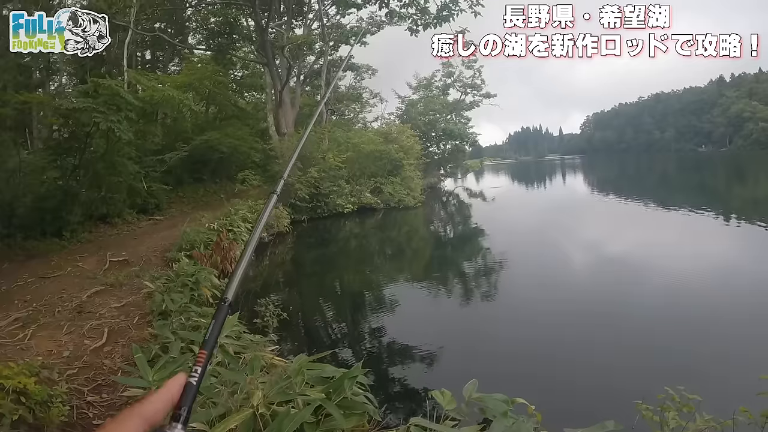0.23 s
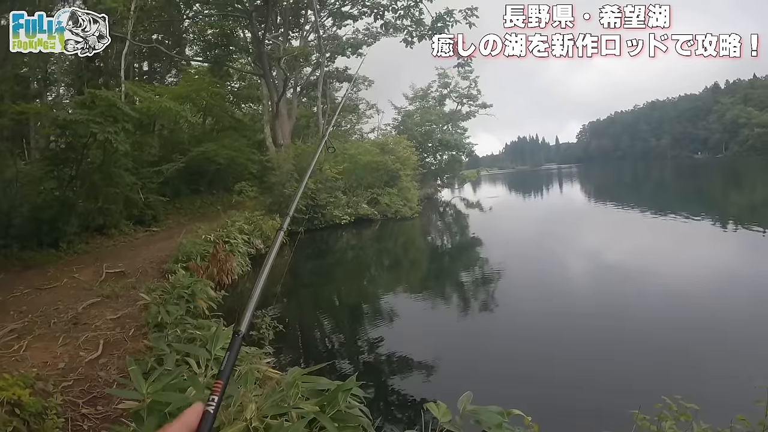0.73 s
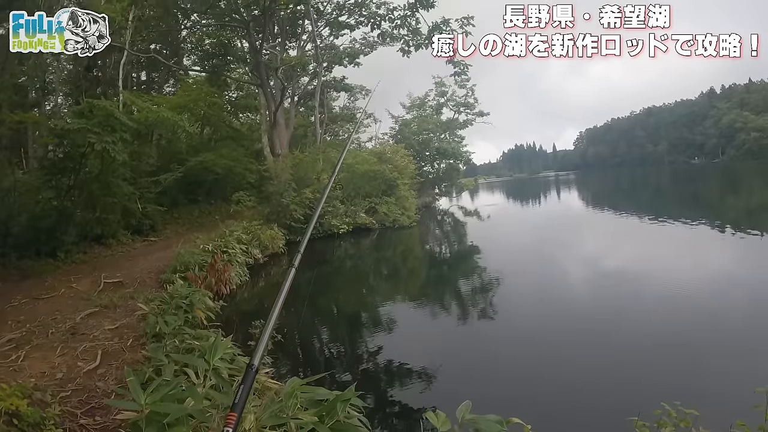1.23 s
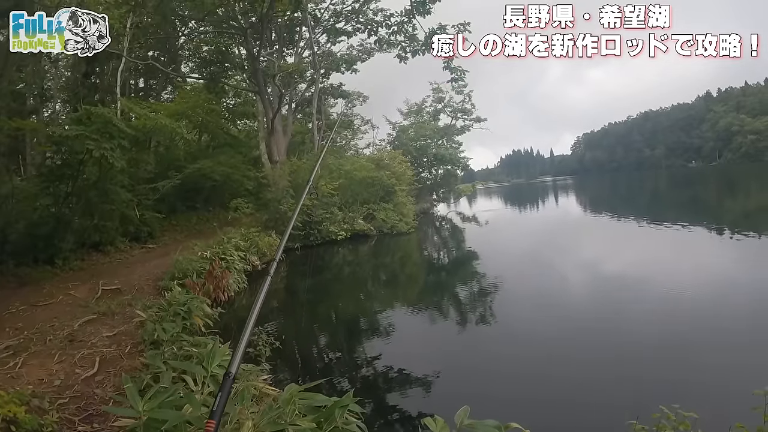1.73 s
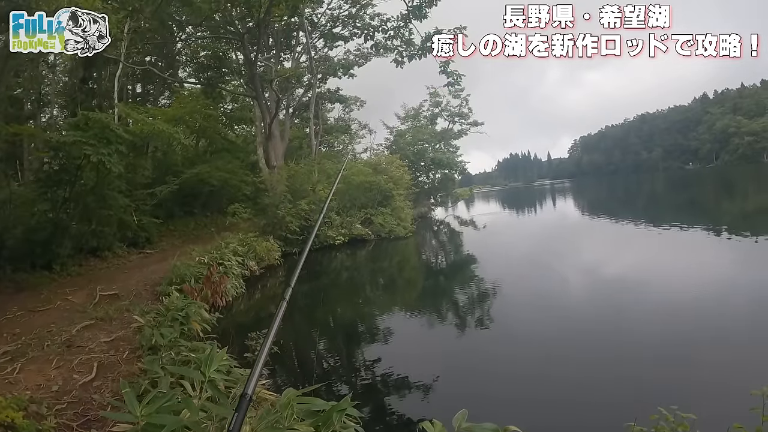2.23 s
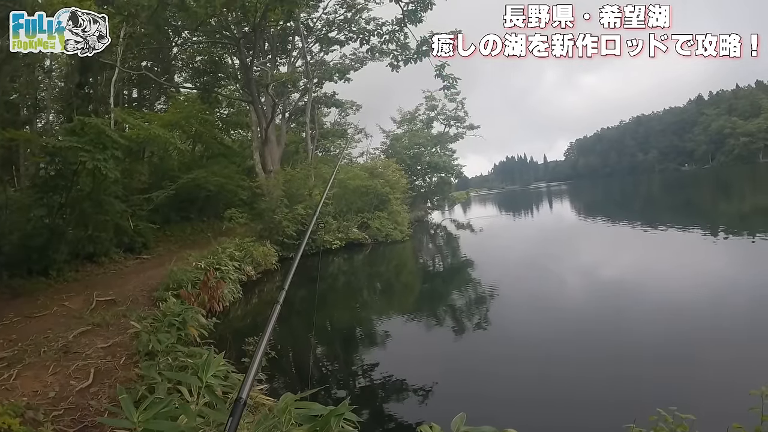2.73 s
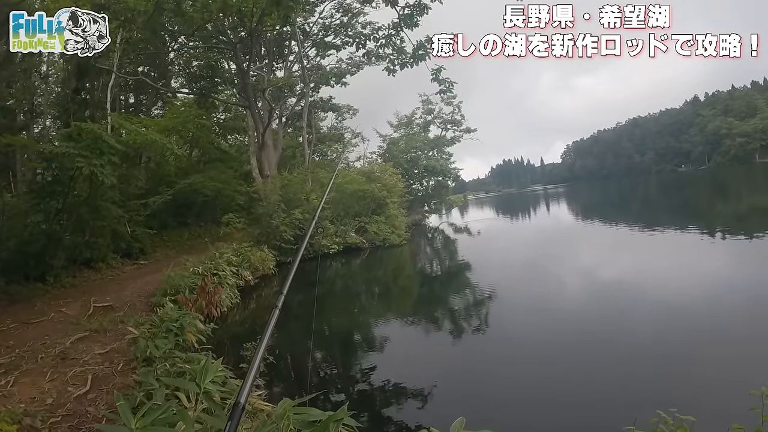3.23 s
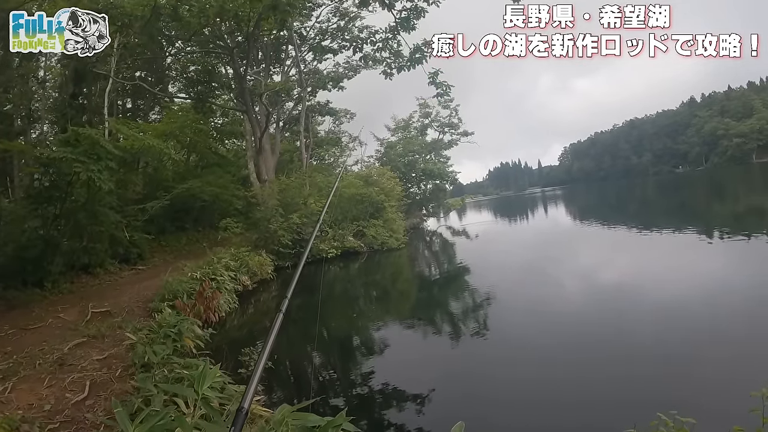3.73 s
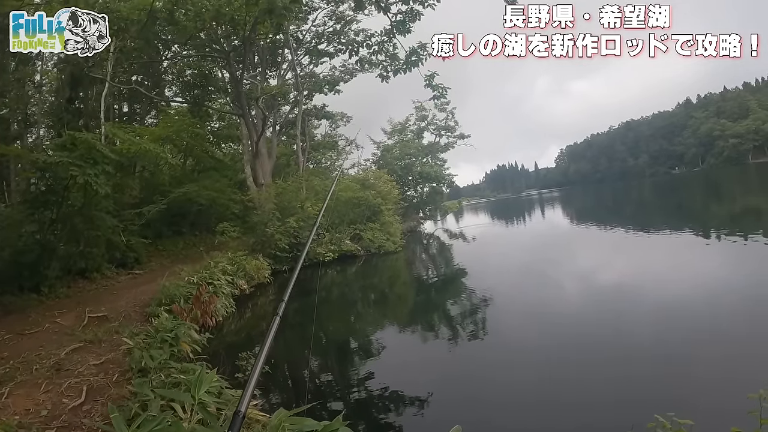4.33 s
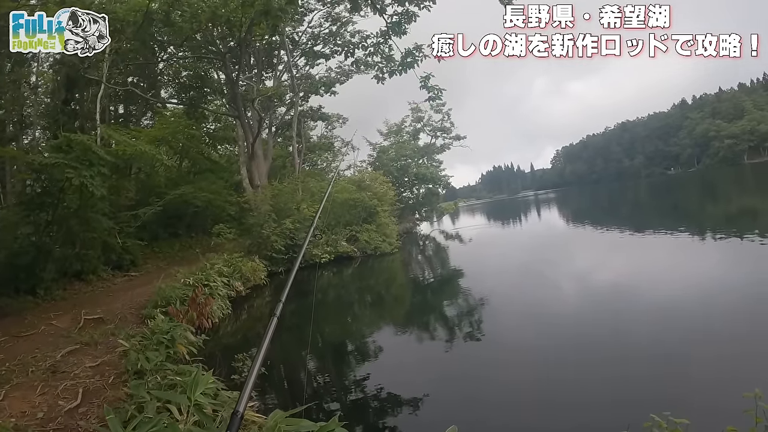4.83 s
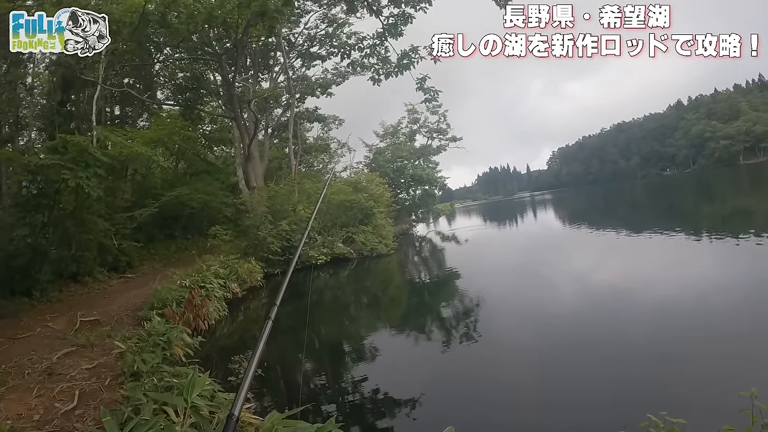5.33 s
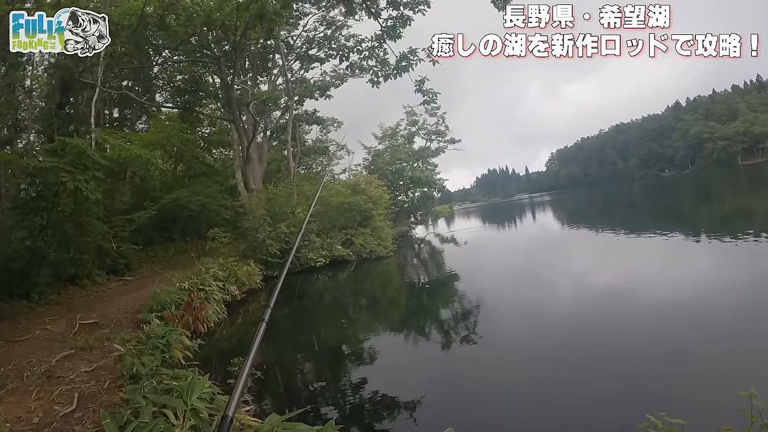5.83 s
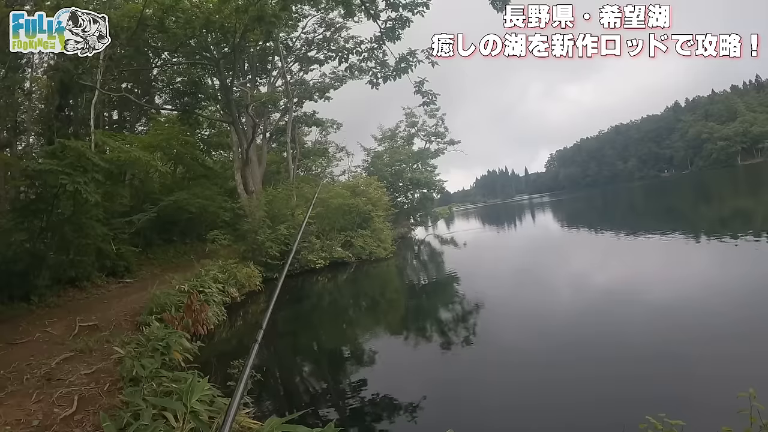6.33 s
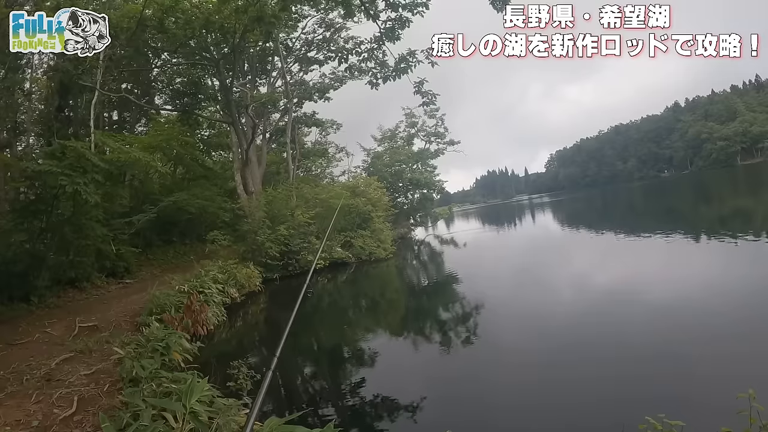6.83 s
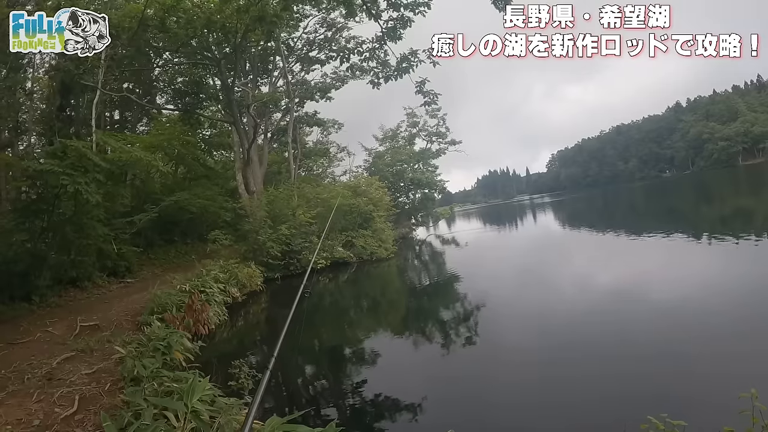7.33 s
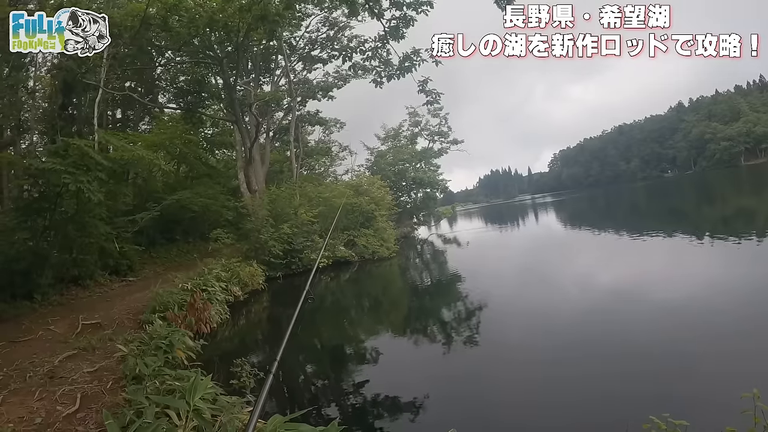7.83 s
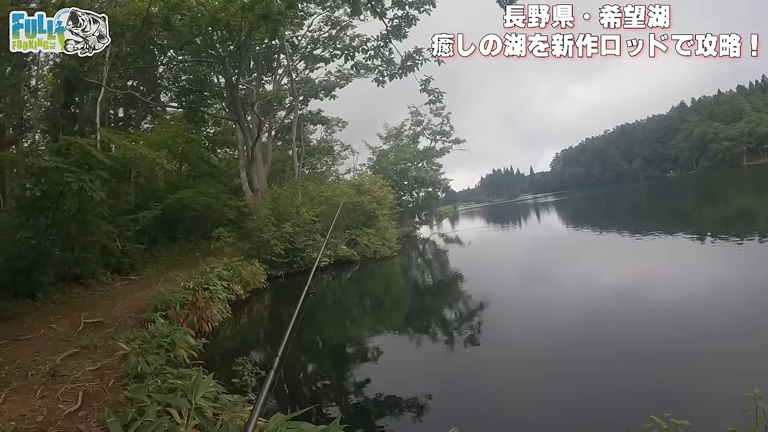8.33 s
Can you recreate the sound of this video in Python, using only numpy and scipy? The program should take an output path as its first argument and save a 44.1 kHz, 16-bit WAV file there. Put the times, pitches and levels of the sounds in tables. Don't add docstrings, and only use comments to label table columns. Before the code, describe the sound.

A bright, unbroken cicada chorus fills woods beside a still lake, heard in stereo from a camera worn by someone fishing. A near cicada, slightly left, buzzes in a dry, rapid rattle throughout, over the smooth hiss of a far crowd. From 0 to 0.7 seconds a distant bird to the right gives short, rough, echoing whistles; fainter notes follow around 1.1 and 3.7. Tiny rod ticks come at about 0.6, 1.05 and 1.3. A faster, higher cicada on the right swells around 1.9, strongest and longest near 4.5, then briefly at 7.2 and 7.9. From about 4 seconds, very faint high rasps of the reel and whispering line sit to the left, slightly clearer near 8.4. Soft low bumps and swaying rumble from the camera recur irregularly to the end at 8.6, above a faint far drone and quiet air.

```python
import sys
import numpy as np
from scipy import signal
from scipy.fft import rfft, irfft, next_fast_len
from scipy.io import wavfile
from scipy.ndimage import uniform_filter1d, map_coordinates

SR = 44100
rng = np.random.default_rng(int(sys.argv[2]) if len(sys.argv) > 2 else 0)


def materialize(psi):
    bounded = np.clip(np.atleast_2d(psi).T, -1, 1)
    quanta = np.round(bounded * 32767).astype(np.int16)
    wavfile.write(sys.argv[1], SR, quanta)


def how_loud(loudness_db):
    steps = np.asarray(loudness_db, float) / 20
    return 10 ** steps


N = 379260
T = np.arange(N) / SR


def unit(x):
    return x / np.sqrt(np.mean(x ** 2) + 1e-20)


def along(points, hz):
    point_hz, value = np.transpose(points)
    return np.interp(np.log(hz + 1), np.log(point_hz + 1), value)


def level_over_time(rows):
    start_s, level_db = np.transpose(rows)
    return np.interp(T, start_s, level_db)


def wobble(rate):
    points = rng.standard_normal(int(N * rate / SR) + 4)
    return map_coordinates(points, [T * rate], order=2)


def bumps(times, sizes, width):
    swells = np.broadcast(times, sizes, width)
    return sum(size * np.exp(-.5 * ((T - s) / w) ** 2) for s, size, w in swells)


def filtered(x, response):
    size = next_fast_len(N + 8192)
    gain = response(np.fft.rfftfreq(size, 1 / SR))
    return irfft(rfft(x, size) * gain, size)[..., :N]


# pitch_hz, likeness (1 = same)
LIKENESS = [(30, .82), (130, .85), (280, .72), (590, .42), (1280, .5), (2750, .84), (5900, .83), (9000, .6),
            (12700, .3)]
# pitch_hz, left_minus_right_db
LEFT_LOUDER = [(60, -0.5), (110, -0.5), (200, -2.5), (360, -3), (650, -4.5), (1170, -0.5), (2130, 1.0),
               (3860, 2), (6990, 2), (12700, 2)]
# pitch_hz, left_leads_radians
LEFT_LEADS = [(0, 1), (1640, -0.91), (2670, -1.05), (2930, -0.93), (3450, -0.0), (4390, -0.73),
              (7490, 0.062), (9220, 0.43), (12800, -0.31)]


def rush(spectrum, patchy_db):
    cells = signal.stft(rng.standard_normal((2, N)), nperseg=512)[2]
    patches = rng.standard_normal(cells.shape[1:])
    patches = uniform_filter1d(patches, size=6, axis=0)
    patches = unit(uniform_filter1d(patches, size=14, axis=1))
    pair = signal.istft(cells * how_loud(patchy_db * patches), nperseg=512)[1][:, :N]

    def shares(hz):
        angle = np.arccos(np.clip(along(LIKENESS, hz), -1, 1)) / 2
        return how_loud(along(spectrum, hz)) * [np.cos(angle), np.sin(angle)]

    def ports(hz):
        tilt = how_loud(along(LEFT_LOUDER, hz) / 2) * np.exp(.5j * along(LEFT_LEADS, hz))
        return [tilt, 1 / tilt]

    mid, side = filtered(pair, shares)
    return unit(filtered(np.array([mid + side, mid - side]), ports))


def falling_chirp(u, length, from_hz, to_hz):
    return 2 * np.pi * length * u * (from_hz + (to_hz - from_hz) * u / 2)


def clicks(cycles, rate, from_hz, to_hz, length, scatter_db, jitter):
    stroke = np.floor(cycles).astype(int)
    first = stroke.min()
    luck = rng.standard_normal((stroke.max() - first + 1, 2))[stroke - first]
    late_s = jitter * (3 + luck[:, 0])
    u = ((cycles - stroke) / rate - late_s) / length
    shape = np.sin(np.pi * np.clip(u, 0, 1) ** 0.93) ** 2
    return how_loud(scatter_db * luck[:, 1]) * shape * np.sin(falling_chirp(u, length, from_hz, to_hz))


def among_trees(x, pan_db, wet_db, t60):
    t = np.arange(SR // 4) / SR
    tail = rng.standard_normal((2, len(t))) * how_loud(-60 * t / t60)
    tail = tail / np.linalg.norm(tail[0])
    wet = signal.fftconvolve(x[None], tail, axes=1)[:, :N]
    direct = x * how_loud(np.array([[pan_db], [-pan_db]]) / 2)
    return direct + how_loud(wet_db) * wet


# start_s, level_db
NEAR_LEVEL = [(0, -56), (.8, -56), (2.9, -53), (4, -53), (4.5, -55), (6, -53), (6.6, -54), (7.4, -52.5),
              (8.6, -52.5)]
# peak_after_stroke_ms, level_db, start_hz, end_hz, length_ms
RIBS_OF_DRUM = [(0, 1, 5200, 3300, 2), (.9, -6, 4000, 2900, 4.2), (2.2, -10, 4500, 3200, 2.5),
                (3.3, -7, 5000, 3500, 2), (4.6, -1, 5100, 3400, 2.2), (4.8, -10, 4000, 2900, 2.6),
                (6.1, -9, 4100, 3000, 2.5), (7.8, -5, 5000, 3400, 2.2), (8.4, -12, 3900, 2900, 2.5),
                (9.2, -11, 5000, 3600, 2)]
# pitch_hz, level_db
BELLY = [(2750, -18), (2950, 0), (3040, -5), (3110, -19), (3250, -3), (3480, -1.5), (3600, -7), (3740, 0),
         (3920, -4), (4420, -1.5), (4570, -1.5), (4750, 7), (4950, -2.5), (7000, -5)]


def near_cicada():
    rate = 47.17
    late_ms = .3 + 5 * (1 - np.exp(-T / 2.6)) - .3 * T
    stroke = rate * (T - late_ms / 1000) - .2 + 0.0025 * wobble(4)
    song = 0
    for peak_ms, level_db, start_hz, end_hz, length_ms in RIBS_OF_DRUM:
        closer = 1.04 - 0.01027 * T
        start_s = (peak_ms * closer - 0.389 * length_ms + 0.061 * wobble(1.227)) / 1000
        strength = how_loud(level_db + 1.2 * wobble(1.5))
        song = song + strength * clicks(stroke - rate * start_s, rate, start_hz, end_hz,
                                        length_ms / 1000, scatter_db=1.3, jitter=.000011)
    song = unit(filtered(song, lambda hz: how_loud(along(BELLY, hz))))
    return among_trees(how_loud(level_over_time(NEAR_LEVEL) + 1.5) * song, pan_db=3, wet_db=-11, t60=.12)


# start_s (its middle), rise_db, width_s
SWELLS = [
    (.1, 2, 0.35),
    (1.899, 3, 0.98),
    (3.4, 1, 0.2),
    (4.5, 7, 0.72),
    (7.2, 3, 0.16),
    (7.9, 4.5, 0.32),
]


def fast_cicada():
    rate = 108.55
    effort_db = bumps(*np.transpose(SWELLS))
    hz = 5800 + 42 * effort_db
    stroke = rate * T + .011 * wobble(2.5)
    rib = clicks(stroke, rate, 1.04 * hz, .96 * hz, .0038, scatter_db=1.1, jitter=.000003)
    wide_click = clicks(stroke, rate, 8000, 5000, .0024, scatter_db=1.1, jitter=.000003)
    song = unit(rib + how_loud(-8) * wide_click)
    level_db = -63 + effort_db + 0.86 * wobble(6.8)
    return among_trees(how_loud(level_db) * song, pan_db=-6, wet_db=-5.5, t60=.12)


# start_s, level_db
CROWD_LEVEL = [(0, -47.5), (1, -47), (3.8, -47), (4.6, -46), (5.7, -47), (8.6, -46.5)]
# pitch_hz, level_db_per_hz
CROWD_HISS = [(2500, -66), (2800, -24.5), (3150, -18), (3300, -13.5), (3900, -8), (4150, -3), (4650, -3),
              (5100, -3.5), (5900, -5), (6400, -7.5), (7200, -15), (8000, -22.5), (10000, -39.5),
              (13000, -44.5)]


def crowd():
    voices = 0
    for rate, hz in [(51, 4430), (45, 4800), (104, 5450), (111, 5900), (106, 6300)]:
        strength = how_loud(1.5 * wobble(1.2))
        stroke = rate * T + .03 * wobble(2.2)
        voices = voices + strength * clicks(stroke, rate, 1.06 * hz, .94 * hz, .0035,
                                            scatter_db=1.5, jitter=.000005)
    distinct = how_loud(-13) * among_trees(unit(voices), pan_db=-2, wet_db=-6, t60=.2)
    hiss = how_loud(-4.5) * rush(CROWD_HISS, patchy_db=.5)
    return how_loud(level_over_time(CROWD_LEVEL) + 0.27 * wobble(9.2)) * (hiss + distinct)


# start_s (its middle), knock_db, sway_db
JOLTS = [(.38, -62, -56), (.95, -58.5, -49.5), (1.27, -59, -60), (1.45, -53.5, -48), (1.94, -58, -58),
         (2.15, -68, -76), (2.47, -53.5, -59), (2.67, -63, -74), (3.04, -60, -67), (3.21, -69, -59),
         (3.42, -63, -58), (3.55, -56, -59), (3.71, -67, -56.5), (4.07, -54.5, -58), (4.42, -76, -64),
         (4.57, -53, -60), (4.93, -64, -58), (5.08, -51, -55), (5.3, -71, -69), (5.58, -63, -47.5),
         (6.13, -60, -53), (6.5, -78, -55), (6.67, -56, -52), (6.82, -64, -56), (7.15, -54.5, -61),
         (7.5, -74, -63), (7.74, -63, -82), (7.87, -76, -59), (8.19, -60, -53.5), (8.54, -59, -45.5)]
# pitch_hz, level_db_per_hz
SWAY_COLOUR = [(5.9, -40), (10, 5.5), (32, 8.5), (60, -17), (78, -26), (130, -120)]
# pitch_hz, level_db_per_hz
KNOCK_COLOUR = [(32, -26.5), (55, 4.5), (86, -6.5), (120, -12.5), (160, -16), (260, -120)]


def mount():
    start_s, knock_db, sway_db = np.transpose(JOLTS)
    sway = how_loud(-58.5) + bumps(start_s, how_loud(sway_db), width=0.052)
    knock = how_loud(-72.5) + bumps(start_s, how_loud(knock_db), width=0.027)
    return sway * rush(SWAY_COLOUR, patchy_db=1.6) + knock * rush(KNOCK_COLOUR, patchy_db=-1.5)


# start_s, length_s, from_hz, to_hz, level_db
BIRD_NOTES = [(0, 0.064, 2184, 2240, -60.5), (.09, 0.088, 1340, 2046, -62.5),
              (.145, 0.049, 2050, 2105, -55.5), (.2, 0.079, 2043, 2100, -66), (.25, .05, 2850, 3000, -75),
              (.285, .055, 2260, 2080, -63), (.29, .05, 1950, 2020, -62), (.3, .04, 2600, 2450, -73),
              (.36, .07, 2200, 2090, -73), (.525, .035, 2450, 1650, -63), (.55, .035, 1750, 1300, -66),
              (.575, .035, 1260, 1120, -63), (.67, .09, 2200, 2200, -76), (1.01, .1, 1130, 1100, -72),
              (1.19, .09, 1070, 1060, -72), (3.69, .08, 2130, 2030, -67), (3.76, .1, 1620, 2060, -72)]


def bird():
    song = np.zeros(N)
    tremor = .35 * np.pi * wobble(160)
    for start_s, length_s, from_hz, to_hz, level_db in BIRD_NOTES:
        u = np.clip((T - start_s) / length_s, 0, 1)
        roughness = np.sqrt(abs(to_hz - from_hz) / 300)
        phase = falling_chirp(u, length_s, from_hz, to_hz) + tremor * roughness
        shape = np.abs(np.sin(np.pi * u)) ** .55 * (u < 1)
        song += how_loud(level_db) * shape * np.sin(phase)
    flutter = how_loud(-.5 + 3 * wobble(140))
    return among_trees(song * flutter, pan_db=-4, wet_db=-2, t60=.4)


# start_s (its middle), level_db
ROD_TICKS = [
    (.6, -67),
    (1.054, -63),
    (1.26, -70),
]
# pitch_hz, level_db_per_hz
TICK_COLOUR = [(300, -30), (700, -6), (2500, 0), (9000, -8), (14000, -20)]


def rod():
    start_s, level_db = np.transpose(ROD_TICKS)
    return bumps(start_s, how_loud(level_db), width=.004) * rush(TICK_COLOUR, patchy_db=0)


# start_s (its middle), level_db
REEL_RASPS = [(4.13, -81), (4.44, -84), (4.72, -85), (5.03, -87), (5.12, -87), (5.36, -83), (5.57, -84),
              (5.94, -82), (6.27, -87), (6.55, -83), (6.87, -84), (7.21, -85), (7.45, -81), (7.77, -86),
              (8.1, -84), (8.36, -77), (8.44, -81), (8.59, -77)]
# pitch_hz, level_db_per_hz
LINE_COLOUR = [(5590, -37), (9500, -1.5), (10000, -6), (11300, -2.5), (12200, -10), (12800, -8)]


def reel():
    start_s, level_db = np.transpose(REEL_RASPS)
    whisper = how_loud(-84.5 + .5 * T)
    line = whisper + bumps(start_s, how_loud(level_db), width=0.018)
    left_right_db = np.array([[2], [-7]])
    return line * how_loud(1.4 * wobble(25) + left_right_db) * rush(LINE_COLOUR, patchy_db=-1.0)


# start_s, level_db
DRONE_LEVEL = [(0, -63.5), (2.15, -61.5), (2.66, -60), (2.8, -63.5), (4.9, -61.5), (5.5, -66.5), (6.3, -61),
               (7, -63.5), (7.2, -59), (8.6, -68)]
# pitch_hz, level_db_per_hz
DRONE_COLOUR = [(68, -27), (115, -9.5), (162, 2.5), (211, -1.5), (250, -10.5), (320, -46), (550, -120)]


def far_drone():
    return how_loud(level_over_time(DRONE_LEVEL) + 0.8) * rush(DRONE_COLOUR, patchy_db=1.8)


# pitch_hz, level_db_per_hz
AIR_COLOUR = [(140, -32), (230, -9.5), (258, -7), (361, -9), (422, -10.5), (478, -15), (634, -18),
              (774, -22), (1030, -17.5), (1080, -16), (1360, -17), (1770, -19), (2800, -20), (3640, -56),
              (6160, -120)]


def still_air():
    return how_loud(-66.5) * rush(AIR_COLOUR, patchy_db=1.32)


def scene():
    cicadas = near_cicada() + fast_cicada() + crowd()
    return cicadas + mount() + bird() + rod() + reel() + far_drone() + still_air()


def top_cut(x):
    return signal.sosfilt(signal.butter(12, 12830, fs=SR, output="sos"), x)


def record(dry):
    return top_cut(dry)


dry = scene()
out = record(dry)
materialize(out)
```